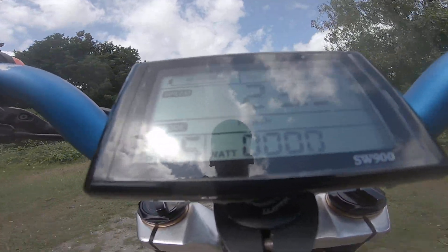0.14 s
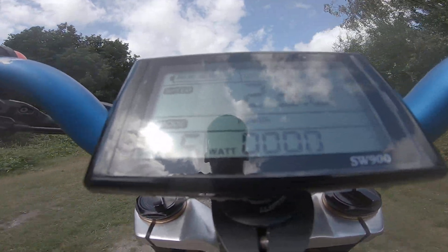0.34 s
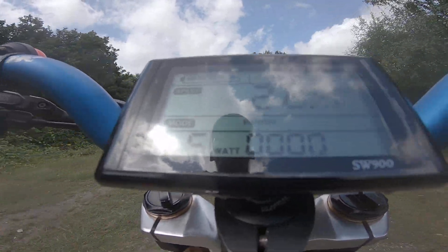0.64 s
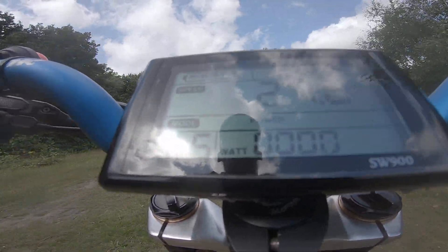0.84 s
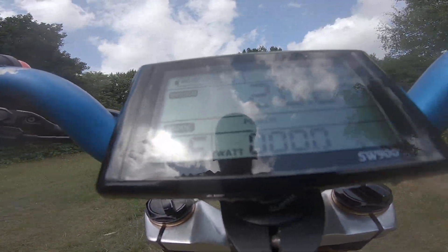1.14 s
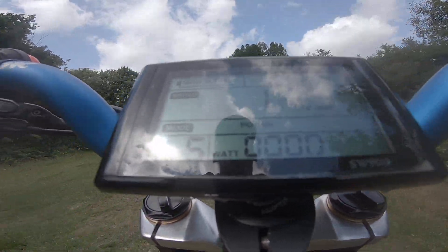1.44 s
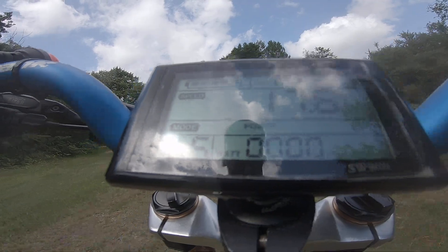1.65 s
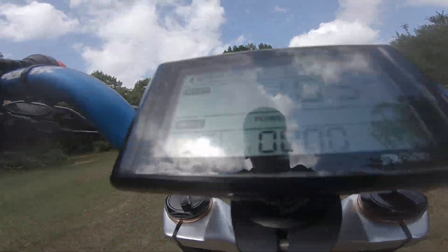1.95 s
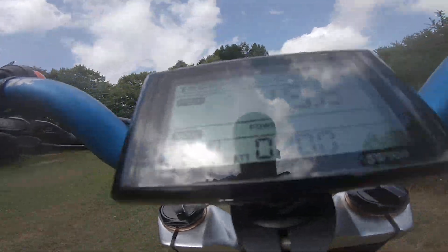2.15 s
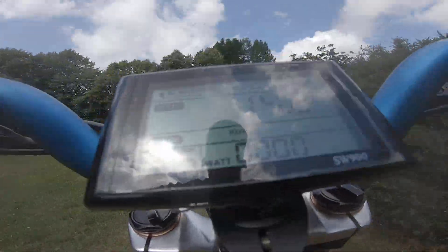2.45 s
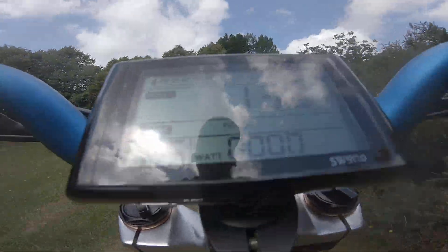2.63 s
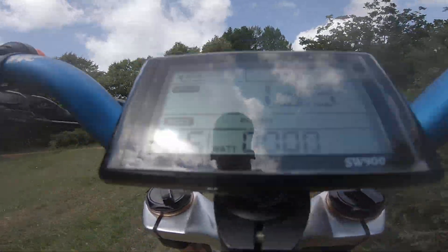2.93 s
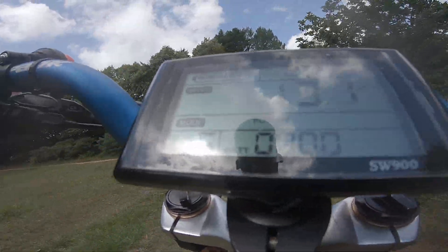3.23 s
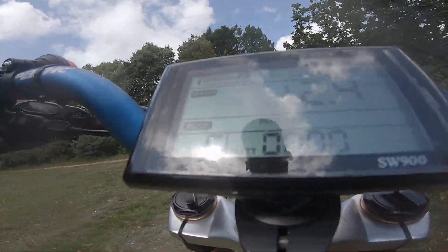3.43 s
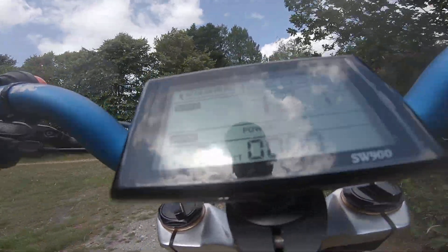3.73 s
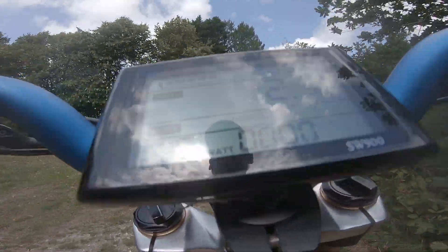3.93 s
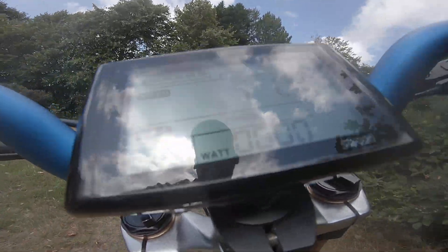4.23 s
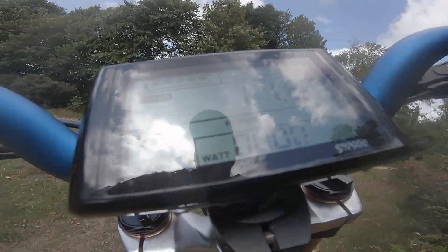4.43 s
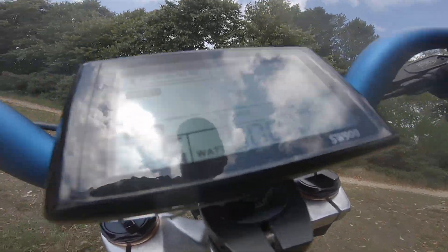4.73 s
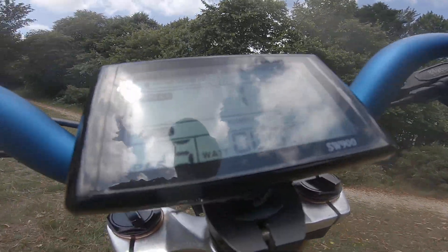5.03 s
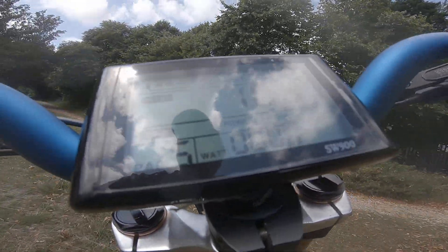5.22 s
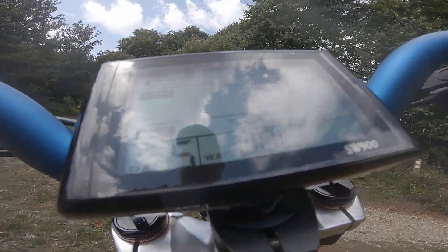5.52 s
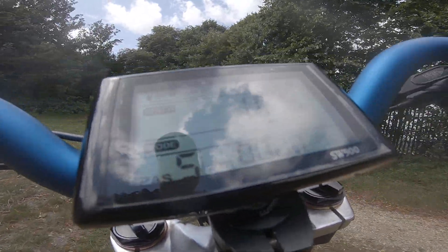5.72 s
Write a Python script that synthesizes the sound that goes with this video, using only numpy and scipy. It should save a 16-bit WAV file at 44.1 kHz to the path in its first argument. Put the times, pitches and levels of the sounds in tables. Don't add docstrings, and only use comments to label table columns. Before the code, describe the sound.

Low wind buffeting and muffled jolts as an electric bike rolls over bumpy grass, with freewheel ticks, hard frame knocks and a rattly cluster near four seconds.

```python
import sys
import numpy as np
from scipy import signal
from scipy.fft import irfft
from scipy.io import wavfile
from scipy.ndimage import uniform_filter1d

SR = 44100
rng = np.random.default_rng(int(sys.argv[2]) if len(sys.argv) > 2 else 0)


def waveform_to_disk(signal):
    frames = np.transpose(np.atleast_2d(signal))
    scaled = np.clip(frames, -1, 1) * 32767
    samples = np.round(scaled).astype(np.int16)
    wavfile.write(sys.argv[1], SR, samples)


def magnitude_from_level(level_db):
    exponent = np.asarray(level_db, float) / 20
    return 10 ** exponent


N = 258858

# [t/s, buffeting level/dB]
WIND_LEVEL = [(0, -18.5), (.6, -27.5), (1.06, -34), (1.5, -30), (1.95, -34.5), (2.4, -27.5), (3.0, -33.5),
              (3.43, -34.5), (3.6, -28.5), (3.95, -26), (4.1, -25), (4.2, -21.5), (4.33, -17), (4.6, -21.5),
              (4.75, -17.5), (4.95, -27.5), (5.36, -28), (5.87, -38.5)]
# [t/s, level change/dB, half length/s]
PUFFS = [(0.709, 13.5, 0.015), (0.742, -14, 0.018), (0.987, 12, 0.022), (1.24, 7, 0.075),
         (1.38, -3.5, 0.031), (1.724, 12, 0.048), (2.182, -7.5, 0.035), (2.359, 10, 0.024),
         (3.078, 6, 0.033), (3.785, 11, 0.012), (3.833, -0.5, 0.017), (4.048, 8.5, 0.067),
         (4.19, -9, 0.032), (4.643, 5, 0.0068), (5.022, 3.5, 0.047), (5.15, -2, 0.034), (5.524, 8.5, 0.018),
         (5.693, 8.5, 0.034), (5.809, -7.5, .04), (5.87, 13, 0.064)]
# [peak t/s, level/dB, rise/s, fall/s]
EDDIES = [(0, -37.5, .03, 0.078), (.15, -36, 0.08, 0.66), (0.732, -29, 0.074, 0.064),
          (1.419, -36, 0.21, 0.34), (1.711, -42.5, 0.042, 0.41), (2.299, -24, 0.022, 0.032),
          (2.45, -32, 0.24, 0.3), (3.43, -40.5, 0.67, 0.02), (3.728, -28.5, 0.065, 0.012),
          (3.949, -33, 0.2, 0.064), (4.141, -26.5, 0.035, 0.052), (4.35, -25, 0.044, 0.048),
          (4.669, -42.5, 0.015, .05), (5.029, -31, 0.066, 0.029), (5.52, -38, 0.082, 0.32),
          (5.868, -25.5, 0.008, 0.044)]
# [f/Hz, level/dB per Hz]
BUFFET_SPECTRUM = [(8.8, -35), (15, 3), (48, 7), (73, 5), (129, 0.5), (260, -42), (340, -50), (570, -120)]
FLUTTER_SPECTRUM = [(90, -30), (150, 0), (200, -4), (270, -14.5), (400, -20), (700, -24.5), (1200, -52)]
SURGE_SPECTRUM = [(110, -31), (160, 7), (210, -12), (270, -16), (350, -48.5)]


def wind():
    t = np.arange(N) / SR
    level_db = column(WIND_LEVEL, index=1) + swells_db(PUFFS)
    eddies = sum(magnitude_from_level(db) * np.exp(-abs(t - s) / np.where(t < s, rise_s, fall_s))
                 for s, db, rise_s, fall_s in EDDIES)
    eddies = eddies + magnitude_from_level(level_db - 45.5)

    buffet = steadied(noise(BUFFET_SPECTRUM, size=2048, patchy_db=1.5, flicker_db=1.8), span_s=0.09)
    flutter = steadied(noise(FLUTTER_SPECTRUM, size=512, patchy_db=2.8, flicker_db=2.8), span_s=0.09)
    surge = steadied(noise(SURGE_SPECTRUM, size=1024, patchy_db=6.0, flicker_db=11.0), span_s=0.069)
    surge_db = -34 + 1.92 * (level_db + 18.0)

    lumps = uniform_filter1d(rng.standard_normal(N), size=600)
    lumps = evened(uniform_filter1d(lumps, size=600))
    layers = magnitude_from_level(level_db) * buffet + magnitude_from_level(surge_db) * surge + magnitude_from_level(-7.0) * eddies * flutter
    return magnitude_from_level(1.1 * lumps + 0.1) * layers


# [t/s, peak level/dB, f/Hz]
JOLTS = [(0.054, -23, 151), (0.093, -30, 151), (0.138, -31, 151), (0.171, -19.5, 161), (0.273, -25, 151),
         (0.425, -26, 188), (0.488, -20, 165), (0.54, -21.5, 154), (0.62, -18.5, 158), (0.63, -22.5, 298),
         (1.331, -28, 221), (1.378, -25.5, 294), (1.47, -24.5, 300), (1.685, -28, 210), (1.964, -29.5, 170),
         (2.289, -13, 439), (2.362, -26, 151), (2.458, -37, 250), (3.068, -45, 147.7), (3.657, -27, 190),
         (3.767, -33, 156), (3.865, -17, 162), (3.953, -18, 400), (4.005, -16, 147), (4.06, -15, 169),
         (4.127, -16.5, 180), (4.264, -18, 167), (4.367, -16, 176), (4.436, -13, 190), (4.664, -9, 161),
         (4.751, -18, 169), (5.005, -29, 181), (5.538, -49, 172)]


def jolts():
    out, t = np.zeros(N), np.arange(2500) / SR
    cycles = 1.2
    for s, db, hz in JOLTS:
        u = t * hz / cycles
        swing = u * np.exp(-2 * u) * np.sin(2 * np.pi * hz * t)
        add(out, s, magnitude_from_level(db - 5) * rng.choice([-1, 1]) * peaked(swing))
    return out


# [t/s, blow level/dB, metal relative level/dB, ring f/Hz]
KNOCKS = [(0.35, -40, -41, 637), (1.965, -34.5, -35, 748), (2.297, -17.5, -30, 1023),
          (2.389, -36.5, -17, 780), (2.403, -31, -20, 794), (2.498, -36.5, -45, 860),
          (2.514, -38, -30, 824), (2.549, -39.5, 9, 865), (2.656, -40, 17.5, 780), (2.72, -40.5, 6, 900),
          (2.828, -40, 8, 906), (2.906, -36, -23, 740), (2.92, -42, -30, 820), (3.148, -40.5, -29, 810),
          (3.401, -44.5, -23, 740), (3.55, -41, -32, 595), (3.757, -33, -41, 724), (3.771, -25, -11.5, 578),
          (3.872, -25, -30, 740), (3.933, -28.5, -14, 680), (3.944, -20, -25, 803), (4.05, -39, -30, 850),
          (4.063, -29, -34, 730), (4.136, -30.5, -30, 672), (4.185, -49, -28, 835), (4.325, -33, -34, 666),
          (4.353, -33.5, -4, 696), (4.413, -36, -4, 680), (4.436, -27.5, 3, 743), (4.446, -37.5, -4, 755),
          (4.531, -46, 1, 704), (4.669, -25, -7, 700), (4.753, -28.5, -22, 743), (4.826, -43, -25, 816),
          (4.853, -43, -25, 770), (4.89, -46, -25, 770), (5.308, -53, 16, 890)]
# [t/s, blow level/dB, metal relative level/dB]
THUMPS = [(0.06, -42, -27), (0.14, -33, -25), (.172, -37.5, -24), (0.243, -45, -13), (0.277, -38.5, -27),
          (0.298, -38, -24), (.49, -41.5, -22), (0.744, -36, -16), (.77, -35.5, -19), (0.621, -36, -25),
          (.634, -29.5, -42), (0.697, -34.5, -3), (0.813, -41, -28), (1.332, -43, -28), (1.383, -40, -30),
          (1.47, -40, -28), (1.69, -36, -29), (1.967, -39.5, -38), (2.282, -19, -24), (2.285, -20.5, -30),
          (2.29, -17.5, -12), (2.302, -23.5, -9), (2.627, -34, 5), (3.716, -36.5, -17), (3.956, -17, -6),
          (3.959, -19, -30), (4.148, -39.5, 16.5), (4.763, -46.5, 11), (5.37, -40, -7), (5.72, -43.5, -28),
          (5.856, -32.5, -30)]
# [f/Hz, level/dB per Hz]
CRACK_SPECTRUM = [(150, -7), (400, -2), (800, -2.5), (1300, -7), (2000, -16.5), (3000, -20), (9000, -43.5)]
# [f/Hz, level/dB, T60/s]
FRAME_MODES = [(439, -31, 0.008), (581, 9.5, 0.018), (659, -9.5, 0.16), (780, 12.5, 0.023), (842, 2, 0.095),
               (1174, 7.5, 0.013), (1280, -15, 0.1), (1360, -0.5, 0.016), (1806, 3, 0.037),
               (2380, -6.5, 0.013)]
# [f/Hz, level/dB, T60/s]
METAL_MODES = [(2280, 5, 0.011), (3720, 7, 0.014), (4494, 3, 0.03), (5830, -22, 0.023), (5480, -7.5, 0.014),
               (6750, 1, 0.022), (8400, -4.5, 0.018)]


def knocks():
    out, t = np.zeros(N), np.arange(5000) / SR
    f, value = np.transpose(CRACK_SPECTRUM)
    crack = irfft(magnitude_from_level(np.interp(np.fft.rfftfreq(2000, 1 / SR), f, value)))
    crack = np.roll(crack, 1000) * np.hanning(2000)
    crack = np.append(crack[900:], np.zeros(3900))

    hardest_db = max(row[1] for row in THUMPS)
    mount_hz = 439
    blows = [(*row, 1) for row in KNOCKS]
    blows += [(*row, mount_hz, magnitude_from_level(.5 * (row[1] - hardest_db))) for row in THUMPS]

    grit_band = signal.butter(2, [1500, 6500], "band", fs=SR)
    for s, db, metal_db, hz, reach in blows:
        thud = np.minimum(t / .002, 1) * magnitude_from_level(-60 * t / .035) * np.sin(2 * np.pi * hz * t)
        dull_crack = signal.lfilter(*signal.butter(1, 3 * hz, fs=SR), crack)
        contacts = clatter(dull_crack, length_s=0.0044)
        frame = ring(FRAME_MODES, detune=.015, uneven_db=2)
        body = 0.68 * thud + np.sqrt(reach) * 0.47 * contacts + reach * 0.62 * frame

        grit = signal.lfilter(*grit_band, rng.standard_normal(5000))
        clash = grit * magnitude_from_level(-60 * t / .025) / 2 + .2 * ring(METAL_MODES, detune=.008, uneven_db=2)
        add(out, s - .0005, magnitude_from_level(db + 8.0) * body)
        add(out, s, magnitude_from_level(db + metal_db - 5.5) * clash)
    return out


def clatter(sound, length_s):
    contacts = rng.standard_normal(1500) * np.exp(-np.arange(1500) / SR / length_s)
    return peaked(signal.fftconvolve(sound, contacts)[:len(sound)])


# [first t/s, last t/s, ticks, level/dB]
RUNS = [(0.718, 0.871, 4, -36), (0.984, 1.073, 2, -36), (1.193, 1.217, 2, -32), (1.271, 1.301, 2, -36.5),
        (1.362, 1.414, 2, -39), (1.498, 1.592, 5, -35), (1.67, 1.6933, 2, -31.5), (1.78, 1.805, 2, -37.5),
        (1.954, 2.067, 3, -35.5), (2.103, 2.202, 5, -36), (2.343, 2.376, 2, -49), (2.509, 2.65, 7, -37.5),
        (2.756, 2.83, 4, -35), (2.868, 2.927, 2, -35), (3.101, 3.235, 7, -35.5), (3.402, 3.4255, 2, -35.5),
        (3.53, 3.671, 8, -36.5), (3.725, 3.8, 2, -35.5), (4.124, 4.14, 2, -29.5), (4.273, 4.292, 2, -33.5),
        (4.338, 4.428, 3, -33.5), (4.505, 4.556, 2, -37.5), (4.593, 4.641, 2, -39.5),
        (4.821, 4.887, 3, -37), (5.04, 5.072, 2, -40.5), (5.432, 5.534, 3, -35.5), (5.62, 5.69, 2, -34)]
# [t/s, level/dB]
SNAPS = [(0.0743, -52), (0.173, -40), (0.263, -38), (0.315, -42), (0.628, -41), (1.74, -38), (1.892, -38),
         (2.2798, -24.5), (2.2947, -17.5), (2.693, -36), (3.049, -41), (3.282, -46), (3.86, -39),
         (3.9447, -25), (3.963, -21), (4.2317, -33), (4.658, -33), (4.748, -32.5), (4.9563, -44),
         (5.774, -34.5)]


def ticks():
    runs = [(s, db) for first, last, count, db in RUNS for s in np.linspace(first, last, round(count))]
    s, db = np.transpose(runs + SNAPS)
    size, spring, off = rng.standard_normal((len(s), 3)).T
    hz = 2250 * (1 + 0.054 * off)
    hz = hz + 1900 * (rng.random(len(s)) < .4)
    twang_db = -29 - 16 * np.exp(-s / 1.8) + 6 * spring
    return zip(s, db + 2 * size, hz, twang_db)


def freewheel():
    out, t = np.zeros(N), np.arange(5000) / SR
    swell_s = .015
    burst = (t / .0026) ** 2 * np.exp(2 - 2 * t / .0026)
    for s, db, hz, twang_db in ticks():
        edge = signal.butter(3, [rng.uniform(560, 3000), rng.uniform(4400, 7200)], "band", fs=SR)
        rub = signal.lfilter(*edge, rng.standard_normal(len(t)))
        scrape = peaked(rub * np.exp(-abs(t - swell_s) / .003))
        spot = np.sin(2 * np.pi * hz * t) * burst ** 2
        hub = ring(METAL_MODES, detune=.008, uneven_db=6) * np.minimum(t / 0.003, 1)
        twang = burst * np.sin(2 * np.pi * (rng.uniform(8300, 8700) - 6e4 * t) * t)
        add(out, s - .002, magnitude_from_level(db - 4.5) * (0.32 * spot + 0.73 * hub))
        add(out, s + 0.001004 - swell_s, magnitude_from_level(db - 11) * scrape)
        add(out, s - .003, magnitude_from_level(db + twang_db + 2) * twang)
    return out


# [t/s, peak level/dB, brightest f/Hz, length/s]
SCRAPES = [(0.072, -35, 1850, 0.0053), (0.098, -45, 1590, 0.0024), (0.259, -37, 1670, 0.0033),
           (0.349, -41.5, 1930, 0.0066), (0.979, -39, 1440, 0.0028), (1.036, -40.5, 2010, 0.0027),
           (1.3046, -43, 2330, 0.0057), (1.311, -40.5, 1490, 0.0021), (1.52, -39, 2270, 0.002),
           (1.564, -47.5, 1220, 0.004), (1.667, -47, 2330, 0.0043), (1.682, -38.5, 1360, 0.01),
           (1.81, -45.5, 1340, 0.0045), (1.922, -44, 1280, 0.0085), (2.125, -46, 1320, 0.0053),
           (2.258, -34.5, 1480, 0.0085), (2.314, -33, 1480, 0.0034), (2.344, -43, 1800, 0.0034),
           (2.368, -37.5, 1370, 0.0051), (2.531, -43, 1210, 0.0027), (2.58, -42, 1720, 0.0045),
           (2.604, -37, 1620, 0.0078), (2.667, -37, 1440, 0.004), (2.747, -45, 1810, 0.003),
           (2.804, -44, 1910, 0.0025), (3.125, -39.5, 1270, 0.0047), (3.167, -41, 2190, 0.0015),
           (3.213, -41, 2300, 0.0031), (3.399, -44, 1450, 0.0031), (3.61, -43, 1810, 0.002),
           (3.654, -40, 2180, 0.0019), (4, -49, 2050, 0.0046), (4.0894, -48, 1950, 0.0053),
           (4.162, -33, 1820, 0.0043), (4.176, -44, 1890, 0.004), (4.233, -36, 1590, 0.0027),
           (4.264, -48, 1490, 0.0032), (4.373, -39, 1270, 0.012), (4.453, -37, 1200, 0.0034),
           (4.508, -41, 1300, 0.0028), (4.59, -44, 1520, 0.0019), (4.648, -40.5, 1280, 0.005),
           (4.707, -41, 1300, 0.004), (4.728, -41, 1260, 0.0051), (5.028, -47.5, 1840, 0.003),
           (5.453, -45, 2350, 0.0054)]


def scrapes():
    out, t = np.zeros(N), np.arange(1500) / SR
    width = 1.39
    top = signal.butter(2, [2800, 7200], "band", fs=SR)
    for s, db, hz, length_s in SCRAPES:
        u = t / np.clip(length_s, .0015, .008)
        a, b, grit = rng.standard_normal((3, len(t)))
        rub = u * np.exp(1 - u) * (1.4 + abs(uniform_filter1d(grit, size=30)) * 4)
        band = signal.butter(2, [hz / width, hz * width], "band", fs=SR)
        low = peaked(signal.lfilter(*band, a * rub))
        bright = peaked(signal.lfilter(*top, b * rub))
        add(out, s - .001, magnitude_from_level(db) * (low + magnitude_from_level(-23) * bright))
    return out


# [t/s, level/dB, f/Hz, T60/s]
RINGING = [(2.301, -55, 4400, 0.055), (2.344, -64, 4400, 0.039), (2.385, -69, 4270, 0.09),
           (2.510, -62, 4170, 0.052), (2.695, -65, 4400, 0.074), (2.385, -46, 1790, 0.047),
           (2.531, -50.5, 1730, 0.064), (2.769, -73, 1840, 0.13), (3.990, -50, 2080, 0.038),
           (4.084, -51, 1910, 0.076), (4.085, -58, 4520, 0.054), (4.137, -41, 1750, 0.08),
           (4.166, -59, 4750, 0.11), (4.454, -53.5, 4400, 0.045), (4.554, -48, 1870, 0.025),
           (4.645, -51, 1870, .05), (4.700, -61, 1860, 0.085), (5.029, -51, 1820, 0.03),
           (3.965, -68, 8200, .12)]


def ringing():
    out, t = np.zeros(N), np.arange(6000) / SR
    half_width_hz = 170
    for s, db, hz, t60 in RINGING:
        band = signal.butter(2, [hz - half_width_hz, hz + half_width_hz], "band", fs=SR)
        tone = evened(signal.lfilter(*band, rng.standard_normal(len(t))))
        decay = magnitude_from_level(db - 60 * np.maximum(t - t60 / 4, 0) / t60)
        add(out, s, decay * np.minimum(t / 0.0035, 1) * tone)
    return out


# [t/s, level/dB, lasting ring relative level/dB]
PINGS = [(2.2822, -58, -21), (2.296, -56, -21), (2.3494, -65, -9), (2.3835, -67, -9), (2.6554, -66, -8),
         (2.83, -65, -17), (2.8685, -63, -19), (3.5434, -68, -28), (3.5872, -67, -15), (3.6257, -68, -16),
         (3.9439, -54, -22), (3.9609, -55, -20), (4.0357, -67, -12), (4.0941, -61, -12), (4.136, -63, -12),
         (4.1438, -55, -5), (4.349, -67, -10), (4.4264, -59, -16), (4.5082, -59, -10), (4.6394, -62, -17),
         (5.5293, -64, -35), (5.691, -50.5, -39)]


def pings():
    out = np.zeros(N)
    band = signal.butter(4, [8600, 12300], "band", fs=SR, output="sos")
    for s, db, ring_db in PINGS:
        add(out, s, magnitude_from_level(db + 2) * clink(band, 0.033, ring_db, hz=11000, ring_t60_s=0.073, length=3000))
    return out


# [t/s, level/dB]
JINGLE_LEVELS = [
    [(3.45, -105), (3.542, -105), (3.722, -83), (3.952, -78), (4.35, -97)],
    [(5.35, -103), (5.76, -77), (5.87, -70)],
]
# [t/s, level/dB, lasting ring relative level/dB]
CLINKS = [(3.548, -78, -33), (3.5902, -66, -22), (3.63, -72, -15), (3.6985, -73, -21), (3.7479, -76, -15),
          (3.7727, -62, -16), (3.7814, -61, -7), (3.842, -72, -19), (3.8574, -65, -16), (3.87, -54, -20),
          (3.8926, -65, -15), (3.9449, -64, -15), (3.96, -61, -15), (4.0417, -70, -22), (4.0552, -64, -21),
          (4.138, -59, -26), (4.147, -76, -10), (4.173, -64, -34), (5.5303, -75, -21), (5.587, -68, -25),
          (5.689, -52, -35), (5.719, -76, 0), (5.773, -71, -15)]


def jingle():
    t = np.arange(N) / SR
    spectrum = [(11000, -17), (12400, 0), (13600, -1), (15500, -11.5)]  # f/Hz, level/dB per Hz
    fizz = noise(spectrum, size=256, patchy_db=3, flicker_db=3.5)
    out = fizz * sum(magnitude_from_level(np.interp(t, *np.transpose(rows), left=-130, right=-130)) for rows in JINGLE_LEVELS)
    band = signal.butter(6, [11800, 14600], "band", fs=SR, output="sos")
    for s, db, ring_db in CLINKS:
        add(out, s, magnitude_from_level(db + 2) * clink(band, .02, ring_db, hz=14100, ring_t60_s=.12, length=4000))
    return out


def clink(band, snap_t60_s, ring_db, hz, ring_t60_s, length):
    u = np.arange(length) / SR
    onset = np.minimum(u / .003, 1)
    snap = peaked(signal.sosfilt(band, rng.standard_normal(length) * magnitude_from_level(-60 * u / snap_t60_s) * onset))
    return snap + magnitude_from_level(ring_db - 60 * u / ring_t60_s) * np.sin(2 * np.pi * hz * u) * onset


# [t/s, frame shaking level/dB]
ROUGHNESS = [(0.0, -77), (0.57, -70), (0.91, -54), (1.13, -55), (1.39, -52), (1.68, -55), (1.99, -55),
             (2.27, -43.5), (2.48, -50), (2.93, -52.5), (3.5, -50.5), (3.78, -47), (3.96, -37), (4.1, -41),
             (4.69, -45), (4.89, -54.5), (5.15, -50.5), (5.87, -51)]
# [t/s, hiss rise/dB, half length/s]
TUFTS = [
    (5.3, 9.5, .025),
    (5.455, 9, 0.012),
    (5.528, 9.5, 0.024),
    (5.686, 12, 0.023),
]
# [f/Hz, level/dB per Hz]
HUM_SPECTRUM = [(500, -40), (1000, -2), (1490, -5), (2000, -4.5), (2700, -13.5), (4000, -17.5),
                (6500, -35.5), (8000, -54.5)]
HISS_SPECTRUM = [(1180, -6), (2000, -16.5), (3040, -17.5), (4810, -25), (5540, -20.5), (6840, -23.5),
                 (9000, -25.5), (11500, -15.5)]


def rolling():
    t, shake_db = np.arange(N) / SR, column(ROUGHNESS, index=1)
    extra_db = shake_db + 50

    rattle = grains(FRAME_MODES, per_s=260, spread_db=2.4, detune=.03, count=8)
    chatter = grains(METAL_MODES, per_s=330, spread_db=4.5, detune=.05, count=10)
    drone = signal.oaconvolve(rng.standard_normal(N), ring(FRAME_MODES, detune=0, uneven_db=2))[:N]
    frame = magnitude_from_level(shake_db) * (magnitude_from_level(-5.5) * rattle + magnitude_from_level(-14.0) * evened(drone))
    frame = frame + aftershake() * (rattle + 0.16 * chatter)

    hum_level = magnitude_from_level(-46 - 6 * t) + magnitude_from_level(-60 + 0.44 * extra_db)
    hum = magnitude_from_level(-6.0) * hum_level * noise(HUM_SPECTRUM, size=256, patchy_db=2.2, flicker_db=1.8)

    hiss_db = -65 + .5 * extra_db + .6 * t + swells_db(TUFTS)
    grass = magnitude_from_level(hiss_db) * noise(HISS_SPECTRUM, size=256, patchy_db=3.2, flicker_db=2)
    return frame + hum + grass + magnitude_from_level(-65.5 + 0.55 * extra_db) * chatter


def aftershake():
    t, t60_s = np.arange(N) / SR, 0.2
    return sum(magnitude_from_level(db - 18.5 - 60 * np.maximum(t - s, 0) / t60_s) * (t > s) for s, db, *_ in KNOCKS)


# [t/s, level/dB]
WHINE_LEVEL = [
    (0, -70),
    (.5, -57),
    (1.42, -55.5),
    (1.6, -78),
    (5.87, -85.5),
]


def whine():
    band = [(1200, -19), (1400, -4.5), (1480, 3.5), (1580, -10), (1950, -8), (2400, -28),
            (5600, -32.5), (5920, -16.5), (6250, -45.5)]
    return magnitude_from_level(column(WHINE_LEVEL, index=1)) * noise(band, size=1024, patchy_db=2, flicker_db=1)


IDLE_MODES = [1330, 2440, 3700, 4400, 4910, 6600]


def idling():
    out = np.zeros(N)
    s = np.arange(0, N / SR, 1 / 43)
    at = np.minimum(((s + .014 * rng.random(len(s))) * SR).astype(int), N - 1)
    whole = rng.random(len(s)) + .03
    u = np.arange(1200) / SR / .003
    for hz in IDLE_MODES:
        train = np.zeros(N)
        train[at] = magnitude_from_level(-2.4 * np.log(whole * (rng.random(len(s)) + .03)))
        puffs = signal.oaconvolve(train, u * np.exp(1 - u))[:N] * rng.standard_normal(N)
        out += signal.lfilter(*signal.butter(2, [hz - 350, hz + 350], "band", fs=SR), puffs)
    return magnitude_from_level(-63) * out


def ring(modes, detune, uneven_db):
    hz, db, t60 = np.transpose(modes)
    t = np.arange(min(5000, int(t60.max() * SR)))[:, None] / SR
    off = rng.standard_normal((2, len(modes)))
    decay = magnitude_from_level(db + uneven_db * off[0] - 60 * t / t60)
    sound = decay * np.sin(2 * np.pi * hz * (1 + detune * off[1]) * t)
    return peaked(np.pad(sound.sum(1), (0, 5000 - len(t))))


def grains(modes, per_s, spread_db, detune, count):
    size = magnitude_from_level(spread_db * np.minimum(rng.exponential(1, N), 4)) * (rng.random(N) < per_s / SR)
    size *= rng.choice([-1, 1], N)
    which = rng.integers(0, count, N)
    out = np.zeros(N)
    for k in range(count):
        out += signal.oaconvolve(size * (which == k), ring(modes, detune, uneven_db=0.0))[:N]
    return evened(out)


def noise(shape, size, patchy_db, flicker_db):
    frames, hz = 4 * N // size + 5, np.fft.rfftfreq(size, 1 / SR)
    a, b, patches = rng.standard_normal((frames, len(hz), 3)).T
    patches = uniform_filter1d(patches, size=5, axis=0)
    patches = evened(uniform_filter1d(patches, size=6, axis=1))
    flicker = evened(uniform_filter1d(rng.standard_normal(frames), size=3))
    f, value = np.transpose(shape)
    colour_db = np.interp(np.log(hz + 1), np.log(f + 1), value, left=-140, right=-140)[:, None]
    z = (a + 1j * b) * magnitude_from_level(colour_db + patchy_db * patches + flicker_db * flicker)
    return evened(signal.istft(z, nperseg=size, noverlap=3 * size // 4)[1][:N])


def steadied(x, span_s):
    return evened(x / np.sqrt(uniform_filter1d(x ** 2, int(span_s * SR)) + 0.11))


def swells_db(rows):
    t = np.arange(N) / SR
    return sum(db * np.exp(-((t - s) / half_s) ** 2) for s, db, half_s in rows)


def column(rows, index):
    rows = np.array(rows)
    return np.interp(np.arange(N) / SR, rows[:, 0], rows[:, index], left=rows[0, index])


def evened(x):
    return x / np.sqrt(np.mean(x ** 2) + 1e-20)


def peaked(x):
    return x / abs(x).max()


def add(mix, s, sound):
    part = mix[max(round(s * SR), 0):][:len(sound)]
    part += sound[:len(part)]


def scene():
    housing = signal.butter(10, 8900, fs=SR, output="sos")
    limit = .6
    gusts = limit * np.tanh(wind() / limit)
    bike = jolts() + knocks() + freewheel() + scrapes() + ringing() + rolling() + whine() + idling()
    return (gusts + signal.sosfilt(housing, bike) + pings() + jingle())[None]


def roll_off(x):
    return signal.sosfilt(signal.butter(12, 15740, fs=SR, output="sos"), x)


def record(dry):
    heard = signal.lfilter(*signal.butter(1, 12, "high", fs=SR), dry)
    return roll_off(heard)


dry = scene()
out = record(dry)
waveform_to_disk(out)
```